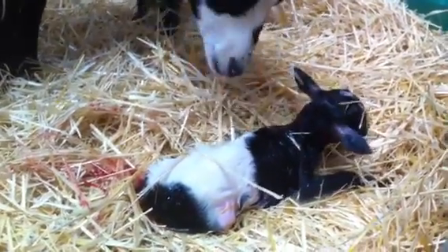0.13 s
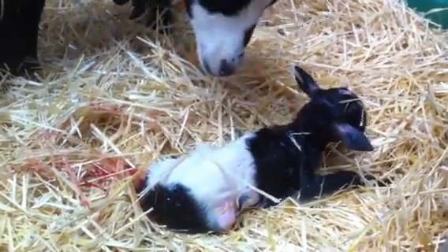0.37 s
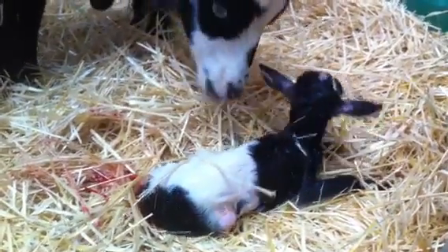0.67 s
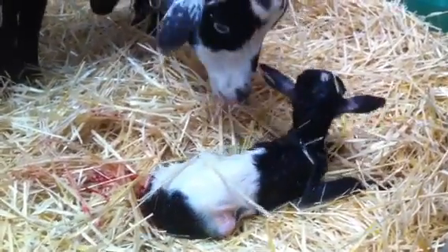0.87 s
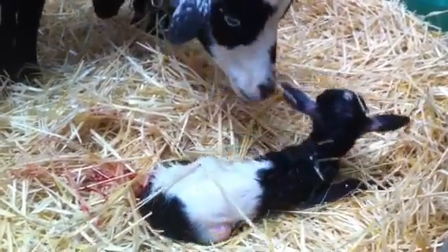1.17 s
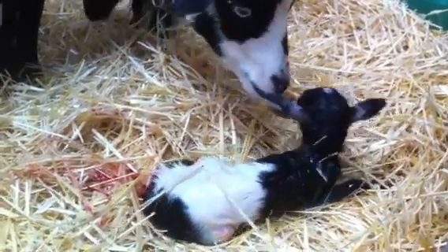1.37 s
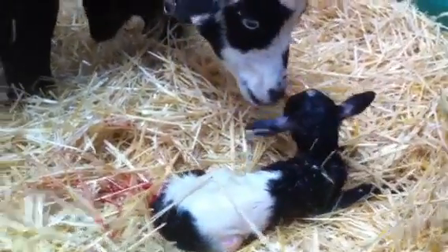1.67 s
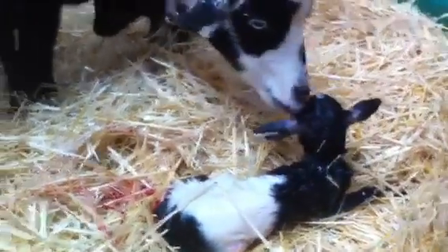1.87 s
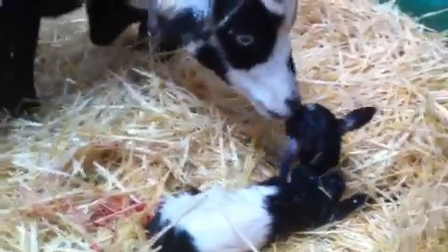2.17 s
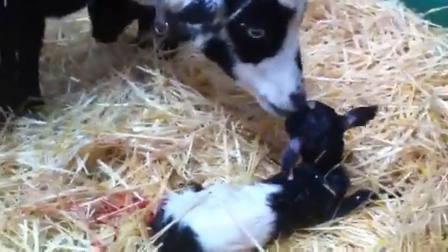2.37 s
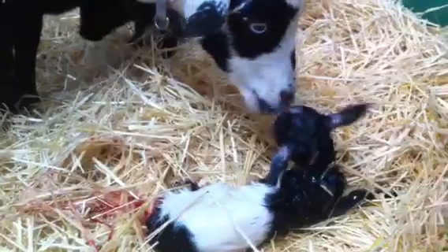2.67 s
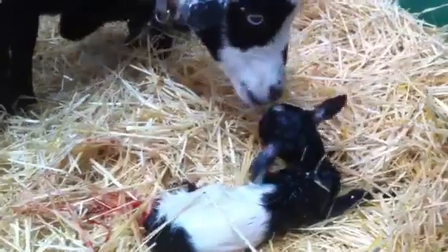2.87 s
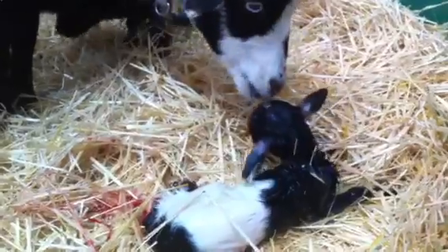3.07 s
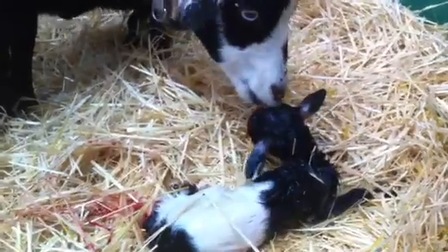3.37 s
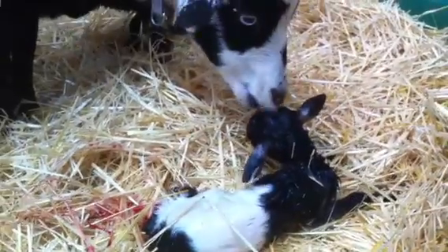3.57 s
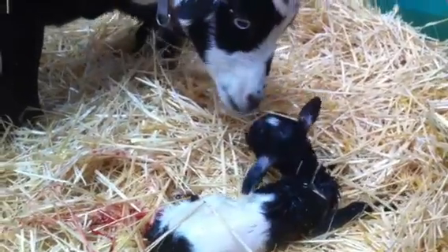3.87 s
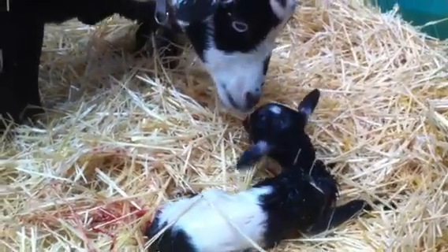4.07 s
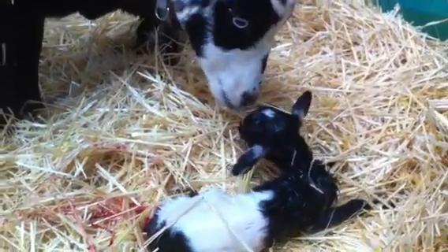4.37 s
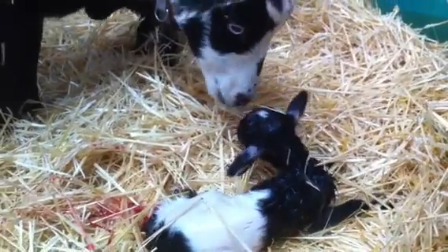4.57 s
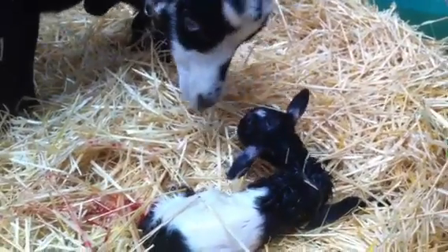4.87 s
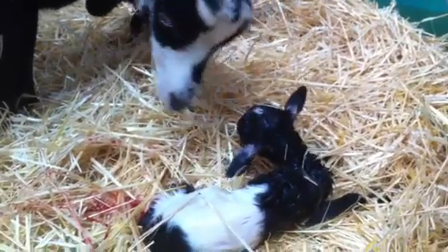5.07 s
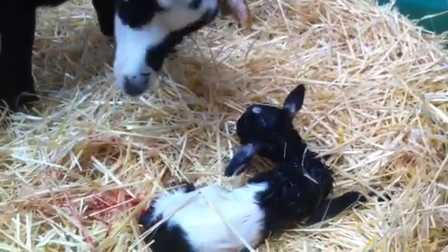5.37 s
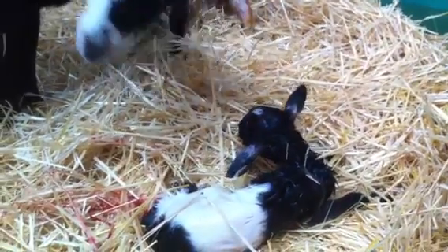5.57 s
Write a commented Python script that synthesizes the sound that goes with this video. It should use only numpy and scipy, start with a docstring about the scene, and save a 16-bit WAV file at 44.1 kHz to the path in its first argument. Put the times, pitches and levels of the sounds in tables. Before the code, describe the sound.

Near-quiet barn air opens, then a burst: raspy, high goat bleats from across the room, piercing two-toned squeals, a kid's short bleat nearby, treading, a hollow bump and crisp straw scuffs. The last cry slides down and fades. Afterwards come faint squeaks, tiny lip smacks and straw snaps, a small quavering bleat at four seconds, and low murmuring air. Single-channel close pickup.

```python
"""Goat pen in a barn

Straw-bedded pen. From across the barn a goat cries loudly, breaking between hoarse bleats (rough fold pulses
and hiss through a throat) and squeals (two strong partials under flickering overtones).
Close by, the newborn kid answers with two thin, throbbing bleats: fold pulses through a changing throat.
The doe shifts in the straw, bumps the pen and nuzzles the kid: shaped noise, short rings and a booming panel.
Behind it all lie small squeaks, licks and snaps, the barn's echo and a low murmur of air."""
import sys
import numpy as np
from scipy import signal
from scipy.fft import rfft, irfft, next_fast_len
from scipy.io import wavfile
from scipy.ndimage import uniform_filter1d, map_coordinates

SR = 44100
rng = np.random.default_rng(int(sys.argv[2]) if len(sys.argv) > 2 else 0)


def waveform_to_disk(signal):
    """Save audio, clipped to [-1, 1], as 16-bit WAV at the path in sys.argv[1]."""
    frames = np.transpose(np.atleast_2d(signal))
    scaled = np.clip(frames, -1, 1) * 32767
    samples = np.round(scaled).astype(np.int16)
    wavfile.write(sys.argv[1], SR, samples)


N = 252252

# Far goat, hoarse bleats: t/s, settling/s, hold/s, release/s, first f/Hz, held f/Hz, last f/Hz,
# relative level/dB, first and last mouth opening/dB, first and last roughness (0-1), air/dB,
# factor on the throat's resonances, firm core/dB, reach of the core f/Hz
HOARSE_BLEATS = [ (0.655, 0.06, 0.12, 0.15, 789, 949, 974, -32, -4.5, 17, 0.22, .8, 12.5, 1.005, -12.5, 1290),
                 (0.907, 0.021, 0.082, 0.16, 924.4, 1066, 1097, -30.5, -1, -9, .85, 0.7, 14.5, 1.06, -20.5, 3480),
                 (1.066, .022, 0.11, .07, 1137, 899, 936, -35.5, 8.5, 4.5, .8, 0.5, 3.5, 1.05, -13, 3800),
                 (1.335, .1, .185, 0.05, 858, 906.7, 945, -34, -3.5, 1, 0.28, .25, 7, 1.021, -4.5, 4390),
                 (1.896, 0.012, 0.105, 0.36, 1005, 775, 346, -30, -1.5, -6, .42, 0.6, 9.5, 0.99, -8.5, 2200)]
# Far goat's throat before that factor: f/Hz, level/dB
FAR_THROAT = [(100, -49), (450, -29.5), (700, -20), (920, 7.5), (1100, 1), (1300, -13.5), (1600, -7),
              (1850, -5.5), (2050, -1.5), (2250, 10), (2450, -7.5), (2800, -18.5), (3100, 3.5),
              (3300, -15.5), (3500, -20), (3900, -35), (4450, -34.5), (4750, -43.5), (5200, -43.5),
              (6800, -22.5), (8500, -35), (9600, -27), (10900, -43), (13500, -31.5), (16000, -33)]
# Pushes of the far goat's belly: t/s, level/dB, half width/s
FAR_THROBS = [(.745, 7, 0.02), (.95, 3, 0.051), (1.44, 6, 0.016), (1.513, 7.5, 0.0091)]
ATTACK_S, SLACK_S = 0.027, 0.25  # swell of a bleat; slackening of the throat once it is let go
RELEASE_DB, RELEASE_BEND = 32, 1.33  # level lost over the release, ever faster
BREATHY_DB = 7  # hiss gained on the voice over the release
RATTLE_HZ, RATTLE_DB = 190, 9  # mean rate; depth at full roughness


def hoarse_cry():
    """Fold pulses and hiss through the far throat; each bleat settles on a pitch, holds, then fades."""
    out, t = np.zeros(N), clock(size=30000)
    for (s, settle, hold, release, first_hz, held_hz, last_hz, db, first_mouth_db, last_mouth_db,
         first_rough, last_rough, air_db, tight, core_db, reach_hz) in HOARSE_BLEATS:
        spent = np.maximum(t - hold, 0) / release
        letting_go = np.minimum(spent, 1)
        progress = ramp(t, hold + release)
        pitch = held_hz + (first_hz - held_hz) * np.exp(-t / settle) + (last_hz - held_hz) * letting_go
        mouth_db = first_mouth_db + (last_mouth_db - first_mouth_db) * progress
        rough = first_rough + (last_rough - first_rough) * progress
        level_db = db + throbbing(s + t, FAR_THROBS) - RELEASE_DB * spent ** RELEASE_BEND
        level = ramp(t, ATTACK_S) * amp(level_db)
        source = folds(pitch, rough, jitter=.05, shimmer=4, uneven_db=3, rasp=amp(air_db),
                       flutter_rate=200, count=9)
        # a slower, uneven oscillation in the throat chops the rough voice into grains
        beat = np.cos(2 * np.pi * np.cumsum(RATTLE_HZ * (1 + .3 * wobble(90, len(t)))) / SR)
        rattle = amp(RATTLE_DB * rough * beat)
        air = split(rng.standard_normal(len(t)), edge_hz=6300)[1]
        hiss = amp(13.5 + air_db + BREATHY_DB * letting_go) * rough * air
        voice = rattle * (source + hiss)
        # the throat's upper resonances shift a little with the pitch
        slack_factor = tight * (last_hz / held_hz) ** 0.13
        held = throat(voice, np.multiply(FAR_THROAT, (tight, 1)))
        slack = throat(voice, np.multiply(FAR_THROAT, (slack_factor, 1)))
        low = split(held, edge_hz=1660)[0]
        slackening = held + (slack - held) * ramp(t - hold, SLACK_S)
        high = split(slackening, edge_hz=1370)[1]
        bleat = steady(low + amp(mouth_db) * high) + amp(core_db) * core(pitch, reach_hz)
        add(out, s, level * bleat)
    return out


# Far goat's two squeals: t/s, relative level of fundamental/dB, relative level of octave/dB
SHORT_SQUEAL = [(0.922, -44.5, -35), (0.944, -29, -25.5), (0.958, -31, -20), (1.06, -41, -40.5),
                (1.096, -46.5, -31), (1.118, -62, -37.5), (1.162, -53.5, -20.5), (1.21, -47, -35),
                (1.238, -41, -28), (1.262, -50.5, -37), (1.29, -47, -37.5)]
LONG_SQUEAL = [(1.475, -43, -31), (1.491, -42, -27), (1.529, -36, -33.5), (1.551, -29, -37.5),
               (1.573, -29, -26.5), (1.637, -28, -19.5), (1.675, -35.5, -29), (1.697, -52, -33.5),
               (1.719, -42, -19.5), (1.741, -34, -18.5), (1.769, -29.5, -27), (1.789, -32.5, -24),
               (1.817, -45, -19.5), (1.843, -39, -34), (1.867, -26, -34), (1.885, -32.5, -20.5),
               (1.917, -25.5, -34.5)]
# The voice in each squeal: first f/Hz, sag/(Hz/s), final droop/Hz, roughness (1 = rough)
SQUEAL_VOICE = [(1241, 175, 2, 0.89), (1098.3, 20, 58, 0.19)]
# The squeal's upper partials: f/Hz, relative level/dB
OVERTONES = [(3200, -40), (4300, -44), (5400, -60.5), (6500, -46.5), (7600, -45), (8700, -61),
             (9700, -41.5), (10800, -71.5), (12000, -51.5), (13000, -50), (14100, -59.5), (15200, -46)]
DROOP_S = .12  # the droop comes in about this long before the end
CRACK_ROUGH, CRACK_S = 1.2, .03  # a squeal cracks: roughness gained, and how long before its end
SQUEAL_JITTER, SQUEAL_SHIMMER_DB = .013, 2.2  # pitch and level unsteadiness per unit of roughness


def squeal(count=14):
    """The far voice flips to a whistle register: two strong partials under faint, flickering overtones."""
    out = np.zeros(N)
    for call, (hz, sag, droop, held_rough) in zip((SHORT_SQUEAL, LONG_SQUEAL), SQUEAL_VOICE):
        first_db, octave_db = curves(call)
        size = len(first_db)
        t = clock(size)
        pitch = hz - sag * t - droop * np.exp((t - t[-1]) / DROOP_S)
        rough = held_rough + CRACK_ROUGH * np.exp((t - t[-1]) / CRACK_S)
        # each overtone wavers in strength and phase
        flicker = [.8 + .55 * (wobble(38, size) + 1j * wobble(38, size)) for k in range(count + 1)]
        drift = 0.0018 * wobble(40, size) + SQUEAL_JITTER * rough * wobble(200, size)
        phase = 2 * np.pi * np.cumsum(pitch * (1 + drift)) / SR
        shimmer = amp(SQUEAL_SHIMMER_DB * rough * wobble(150, size))
        effort = uniform_filter1d(amp(first_db) + amp(octave_db), size=4000)
        upper = np.zeros(size)
        for k in range(3, count + 1):
            overtone = np.imag(flicker[k] * np.exp(1j * k * phase))
            upper += amp(along(OVERTONES, k * pitch) + 8.5) * overtone
        strong = amp(first_db) * np.sin(phase) + amp(octave_db) * np.sin(2 * phase)
        edges = signal.windows.tukey(size, .05)
        add(out, call[0][0], edges * np.sqrt(2) * shimmer * (strong + effort * upper))
    return out


# The newborn's bleats, close by: mouth opens t/s, voice gives out t/s, relative level/dB, mouth opening/dB
KID_BLEATS = [(0.896, 1.014, -37.5, 0.5), (4.095, 4.325, -47, 9.5)]
# Its voice in each bleat: t/s, f/Hz, roughness (0 = clean, about 1 = rough)
KID_VOICE = [
    [(.8, 780, 0.4), (.845, 1040, .6), (.9, 1018, .35), (.94, 1049, .95), (.972, 1003, 0.3),
     (1.0, 1039, .08), (1.025, 1039, .15), (1.06, 874, 1.1), (1.15, 701, 1)],
    [(3.955, 659, 0.48), (3.98, 851.3, 0.33), (4.012, 1043, .15), (4.06, 1054, 0), (4.085, 1028, 0.2),
     (4.096, 1045, 0.2), (4.11, 1037, .12), (4.145, 1073, .07), (4.172, 1023, 0), (4.21, 1037, 0.09),
     (4.243, 1033, 0.26), (4.3, 1043, 0), (4.32, 1024, .12), (4.338, 951, 0.86), (4.365, 738, 0.97),
     (4.48, 656, 1.14)],
]
# Its throat as each bleat opens and as it ends: f/Hz, level/dB
KID_THROATS = [ ([(500, -26.5), (1030, -9.5), (2070, -6.5), (3100, -6), (4150, -7), (6200, -13), (7250, -7),
               (8300, -3), (9300, -13), (16000, -19)], [(500, -13), (1030, -5.5), (2070, -3.5), (3100, -8),
               (4150, -2.5), (5200, -9), (6200, -5), (7250, -11), (8300, 2.5), (9300, -10), (12500, -9),
               (16000, -24)]), ([(100, -45), (500, -17), (1030, -9.5), (2070, 4), (3100, -0.5), (5200, -10),
               (6200, 2.5), (7250, -6.5), (8300, -21), (9300, -13), (11500, -9), (13600, -29),
               (16000, -32.5)], [(100, -50), (500, -34), (1030, -10), (2070, 0), (3100, -5.5), (4150, -12),
               (5200, -3), (6200, -2), (7250, -11), (8300, -7.5), (9300, -20), (10400, -18.5), (12500, -22),
               (16000, -41)])]
# Pushes of its belly: t/s, level/dB, half width/s
KID_THROBS = [(0.901, 4, 0.0087), (0.995, 10, 0.015), (3.988, 8.5, 0.018), (4.108, 9.5, 0.017),
              (4.19, 15.5, 0.019), (4.293, 13, 0.014), (4.333, 4.5, 0.031)]
BLEAT_ATTACK_S, THROAT_GLIDE_S = 0.021, 0.099  # swell; passage from one throat shape to the next
FADE_DB_PER_S = 187.5  # the level falls away once the voice gives out
SHUT_DB, SHUT_DULL_DB, OPENING_S = -9, -29, 0.0079  # a shut mouth is softer and duller; opening time
THROB_DULL = 0.7  # dB of brightness lost per dB of throb


def newborn():
    """The voice scoops up behind a shut mouth, opens, throbs as the throat changes, then drops, rough."""
    out = np.zeros(N)
    for (opens, gives_out, db, open_db), voice, shapes in zip(KID_BLEATS, KID_VOICE, KID_THROATS):
        first_shape, last_shape = shapes
        pitch, rough = curves(voice)
        s = voice[0][0]
        t = s + clock(len(pitch))
        throb_db = throbbing(t, KID_THROBS)
        ending = np.maximum(t - gives_out, 0)
        shut = 1 - np.exp(np.minimum(t - opens, 0) / OPENING_S)
        mouth_db = open_db + SHUT_DULL_DB * shut - THROB_DULL * throb_db
        level_db = db + throb_db + SHUT_DB * shut - FADE_DB_PER_S * ending
        level = ramp(t - s, BLEAT_ATTACK_S) * amp(level_db)
        source = folds(pitch, rough, jitter=.035, shimmer=4.2, uneven_db=2.5, rasp=1.5,
                       flutter_rate=250, count=15)
        glide = ramp(t - opens, THROAT_GLIDE_S) ** 2
        shaped = (1 - glide) * throat(source, first_shape) + glide * throat(source, last_shape)
        low, rest = split(shaped, edge_hz=1300)
        middle, high = split(rest, edge_hz=6200)
        add(out, s, level * steady(low + amp(0.71 * mouth_db) * middle + amp(mouth_db) * high))
    return out


# The doe's steps in the bedding: t/s, thud relative level/dB, rustle relative level/dB
STEPS = [(.7, -56.5, -71.5), (0.871, -44.5, -37), (.95, -50, -34.5), (1.08, -54, -36), (1.24, -37, -39.5),
         (1.32, -48.5, -47), (2.108, -56.5, -55.5)]
# Spectrum of the thuds: f/Hz, level/dB
THUD = [(25, -34), (65, -22.5), (115, 0), (250, 0), (400, -4), (560, 3), (1000, -13), (2500, -29)]
# Spectrum of the rustling bedding: f/Hz, level/dB
RUSTLE = [(200, -26.5), (700, -2.5), (1800, 4), (3400, -1.5), (4700, -5.5), (5600, -13.5), (8000, -14),
          (10000, -18), (16000, -19.5)]
# Her weight on the ground: a short low step thud, then a hard bump against the pen; t/s, relative level/dB,
# swell/s, t60/s
BUMPS = [(0.976, -45.5, 0.006, 0.1), (1.204, -25.5, 0.023, 0.29)]
# Spectrum of the bumped pen: f/Hz, level/dB
PEN = [(30, -37), (90, -17), (150, -11.5), (220, 0), (350, -8), (550, -3), (900, -2.5), (2000, -6.5),
       (4000, -13.5), (8000, -15.5), (16000, -27)]
# Hooves scuffing through straw: t/s, relative level/dB, swell/s, t60/s
SCUFFS = [(1.207, -20, 0.001, 0.084), (1.284, -24, 0.0014, 0.23), (1.37, -42, 0.012, 0.3),
          (1.408, -25, 0.0071, 0.22)]
# Spectrum of the scuffed straw: f/Hz, level/dB
STRAW = [(300, -39), (2000, -13), (6000, -8), (8500, -2.5), (12000, -3), (16000, -1.5)]
STEP_SWELL_S, STEP_T60_S = 0.011, 1.31  # each step swells, then the straw settles


def doe():
    """Close by, noise swells and dies as she treads the bedding, bumps the pen and scuffs the straw."""
    thud_power, rustle_power, t = np.zeros(N), np.zeros(N), clock(size=2 * SR)
    step = (1 - np.exp(-t / STEP_SWELL_S)) * amp(-60 * t / STEP_T60_S)
    for s, thud_db, rustle_db in STEPS:
        add(thud_power, s, (amp(thud_db) * step) ** 2)
        add(rustle_power, s, (amp(rustle_db) * step) ** 2)
    grains = amp(2.0 * wobble(900) + 1.6 * wobble(70))
    stalks = unit(colour(rng.standard_normal(N) * grains, RUSTLE))
    tread = np.sqrt(thud_power) * noise(THUD) + np.sqrt(rustle_power) * stalks
    bumps = amp(7.5) * bursts(BUMPS, PEN, grain_db=-1.0)
    return tread + bumps + bursts(SCUFFS, STRAW, grain_db=1.5)


def bursts(rows, points, grain_db):
    """Crackling noise that swells and dies after each push."""
    shape = np.zeros(N)
    for s, db, swell, t60 in rows:
        age = np.maximum(clock() - s, 0)
        shape += amp(db - 60 * age / t60) * (1 - np.exp(-age / swell))
    return shape * unit(colour(rng.standard_normal(N) * amp(grain_db * wobble(1900)), points))


# Modes of the pen wall: f/Hz, relative level/dB, t60/s
PANEL_MODES = [(224.5, -2, 0.32), (313.6, -15, 0.25), (469.5, -12, .3), (596, -12, 0.21), (753, -8, 0.12)]


def panel():
    """The pen wall booms briefly, as decaying and slightly unsteady modes, when it is bumped."""
    out, t = np.zeros(N), clock(size=SR)
    for s, push_db, _, _ in BUMPS:
        ring = np.zeros(len(t))
        for hz, db, t60 in PANEL_MODES:
            phase = 2 * np.pi * hz * t + .8 * wobble(45, len(t))
            ring += amp(db - 60 * t / t60) * np.sin(phase)
        add(out, s, amp(push_db - 0.5) * ramp(t, 0.012) * ring)
    return out


# Licks, lip smacks and straw snaps: t/s, relative level/dB, ring f/Hz, ring share (0-1), t60/s
TICKS = [(0.299, -53.5, 396, 0.93, 0.054), (0.392, -51, 382, 0.81, 0.088), (2.349, -39, 13100, .2, 0.016),
         (2.374, -49.5, 4240, 0.5, 0.11), (2.503, -48.5, 340, 0.77, 0.14), (2.598, -52, 3480, .2, 0.028),
         (2.772, -52.5, 11300, .4, 0.022), (2.856, -46, 1895, 0.33, 0.03), (2.864, -49, 1697, 0.46, 0.019),
         (3.268, -49.5, 1466, .38, 0.027), (3.431, -51, 3490, .3, 0.032), (4.094, -34.5, 3174, 0.59, 0.047),
         (4.924, -49, 830, 0.69, .06), (5.136, -46, 9430, .4, 0.022), (5.221, -54, 1000, 0.58, .03),
         (5.416, -52, 1024, .7, 0.026), (5.570, -46.5, 11800, .3, .02), (5.594, -57, 2780, .2, .02),
         (5.617, -43, 940, 0.67, 0.024)]
FAINT_TICK_DB, FAINT_TICK_HZ = -54, 3000  # fainter ones scatter by chance about this level and pitch


def ticks(count=12):
    """Licks, smacks and snaps: a tiny crack, duller for the low ones, and a short, impure ring."""
    out, t = np.zeros(N), clock(size=SR // 10)
    faint = []
    for when, force, tone in rng.random((count, 3)):
        hz = FAINT_TICK_HZ * 4 ** (2 * tone - 1)
        faint.append((when * N / SR, FAINT_TICK_DB + 6 * (force - .5), hz, .3, .02))
    for s, db, hz, share, t60 in TICKS + faint:
        crack = .5 * unit(split(rng.standard_normal(len(t)), edge_hz=3 * hz)[0])
        ring = np.sin(2 * np.pi * hz * t + wobble(hz / 6, len(t)))
        add(out, s, amp(db - 2.0 - 60 * t / t60) * ((1 - share) * crack + share * ring))
    return out


# Faint, thin tones: centre t/s, f/Hz, relative level/dB; the first, at 2.2 s, strengthens a partial of the far
# goat's falling bleat, the rest are faint squeaks
SQUEAKS = [(2.2, 967, -45.5), (2.41, 1036, -53.5), (4.9, 2267, -72), (5.69, 2380, -74)]
SQUEAK_WIDTH_S, SQUEAK_SAG_HZ_PER_S = 0.034, 511


def squeaks():
    """Brief, nearly pure tones that sag as they swell and fade."""
    out, t = np.zeros(N), clock(size=SR // 4) - 1 / 8  # time zero is the middle of the squeak
    for s, hz, db in SQUEAKS:
        pitch = (hz - SQUEAK_SAG_HZ_PER_S * t) * (1 + 0.0403 * wobble(210.0, len(t)))
        tone = np.sqrt(2) * np.sin(2 * np.pi * np.cumsum(pitch) / SR)
        level = amp(db + 4 * wobble(110, len(t))) * bell(t, SQUEAK_WIDTH_S)
        add(out, s + t[0], level * tone)
    return out


# The doe's muzzle brushing coat and straw: t/s, half width/s, body level/dB, hiss level/dB
NUZZLES = [(.13, 0.069, -67, -71), (.5, 0.1, -66, -65.5), (2.529, 0.21, -60.5, -66),
           (3.45, 0.14, -64.5, -112), (3.885, 0.071, -73, -65), (4.675, 0.025, -81, -62),
           (5.12, 0.12, -72, -66), (5.24, 0.0636, -67, -73.5), (5.7, 0.059, -85, -61.5)]
# Spectrum of the barn's air and the quiet straw: f/Hz, level/(dB per Hz)
BARN_AIR = [(25, -37.5), (45, -41), (65, -18.5), (90, -13.5), (135, 2), (200, -2), (300, -2), (450, -3),
            (700, -6), (1150, -7), (1800, -13), (2600, -14.5), (8000, -17.5), (16000, -18.5)]
BODY_FLOOR_DB, HISS_FLOOR_DB = -69.5, -68  # the bedding at rest


def bedding():
    """The barn's low murmur of air, and a fine crackle of straw that swells with each nuzzle."""
    body_power, hiss_power = amp(BODY_FLOOR_DB) ** 2, amp(HISS_FLOOR_DB) ** 2
    for s, width, body_db, hiss_db in NUZZLES:
        swell = bell(clock() - s, width)
        body_power = body_power + (amp(body_db) * swell) ** 2
        hiss_power = hiss_power + (amp(hiss_db) * swell) ** 2
    rumble = split(noise(BARN_AIR), edge_hz=306)[0]
    stalks = colour(rng.standard_normal(N) * amp(2.0 * wobble(500)), BARN_AIR)
    body, hiss = split(split(stalks, edge_hz=290)[1], edge_hz=2800)
    straw_body = np.sqrt(body_power) * amp(0.91 * wobble(30)) * unit(body)
    straw_hiss = np.sqrt(hiss_power) * amp(0.58 * wobble(25)) * unit(hiss)
    return amp(-71.0 + 1.623 * wobble(12.0)) * unit(rumble) + straw_body + straw_hiss


# How long the barn rings: f/Hz, t60/s
BARN_T60 = [(150, 0.87), (500, 0.54), (1000, 0.43), (2300, 0.49), (5000, 0.37), (12000, 0.0097)]


def barn(x, wet_db):
    """Add the barn's echo: a noise tail, each frequency dying at its own speed."""
    hz, t, z = signal.stft(rng.standard_normal(SR), SR, nperseg=256)
    decay = amp(-60 * t / along(BARN_T60, hz)[:, None])
    tail = signal.istft(z * decay, SR, nperseg=256)[1]
    late = np.pad(x, (350, 0))  # the echo starts 350 samples, about 8 ms, after the direct sound
    return x + amp(wet_db) * signal.fftconvolve(late, tail / np.linalg.norm(tail))[:N]


def folds(pitch, rough, jitter, shimmer, uneven_db, rasp, flutter_rate, count):
    """Vocal-fold pulses; roughness unsettles their timing and size and adds a puff of air to each."""
    size = len(pitch)
    phase = 2 * np.pi * np.cumsum(pitch * (1 + jitter * rough * wobble(flutter_rate, size))) / SR
    pulses = np.zeros(size)
    for k in range(1, count + 1):  # every partial also swells and fades by itself
        pulses += amp(uneven_db * wobble(35, size)) * np.cos(k * phase)
    air = rng.standard_normal(size) * (1 + np.cos(phase))
    return (pulses + rasp * rough * air) * amp(shimmer * rough * wobble(flutter_rate, size))


def core(pitch, reach_hz, count=5):
    """The firm low partials that carry a hoarse voice's pitch, 12 dB down at their reach."""
    size = len(pitch)
    phase = 2 * np.pi * np.cumsum(pitch * (1 + .012 * wobble(130, size))) / SR
    partials = np.zeros(size)
    for k in range(1, count + 1):
        level_db = 3 * wobble(70, size) - 12 * (k * pitch / reach_hz) ** 2
        partials += amp(level_db) * np.sin(k * phase)
    return unit(partials)


def throat(x, points):
    """Ring x through a causal (minimum-phase) filter with a (Hz, dB) spectrum."""
    size = 4096
    cepstrum = irfft(np.log(amp(along(points, np.fft.rfftfreq(size, 1 / SR)))))
    # folding the cepstrum forward makes the filter causal
    cepstrum[1:size // 2] *= 2
    cepstrum[size // 2 + 1:] = 0
    return signal.fftconvolve(x, irfft(np.exp(rfft(cepstrum))))[:len(x)]


def throbbing(t, rows):
    """The dB that pushes of the belly add to a voice."""
    return sum(db * bell(t - s, width) for s, db, width in rows)


def amp(db):
    """Decibels to gain."""
    return 10 ** (np.asarray(db) / 20)


def unit(x):
    """Scale to rms 1."""
    return x / np.sqrt(np.mean(x ** 2) + 1e-20)


def steady(x):
    """Hold x near rms 1 over 1100 samples, a few hundredths of a second."""
    return x / np.sqrt(np.abs(uniform_filter1d(x ** 2, size=1100)) + 1e-9)


def clock(size=N):
    """The time of every sample, in seconds."""
    return np.arange(size) / SR


def ramp(t, length):
    """Rise from 0 to 1 over a length of time."""
    return np.clip(t / length, 0, 1)


def bell(t, width):
    """A smooth swell around time zero."""
    return np.exp(-.5 * (t / width) ** 2)


def along(points, hz):
    """Interpolate (Hz, value) points on a log frequency axis."""
    f, v = np.transpose(points)
    return np.interp(np.log(hz + 1), np.log(f + 1), v)


def curves(rows):
    """One value per sample, from the first row to the last, for each column after the time."""
    s, *cols = np.transpose(rows)
    return [np.interp(np.arange(s[0], s[-1], 1 / SR), s, c) for c in cols]


def wobble(rate, size=N):
    """A smooth random curve, rate knots a second."""
    return map_coordinates(rng.standard_normal(int(N * rate / SR) + 4), [clock(size) * rate])


def filtered(x, response):
    """x times a response of frequency."""
    m = next_fast_len(len(x) + 8192)
    return irfft(rfft(x, m) * response(np.fft.rfftfreq(m, 1 / SR)), m)[:len(x)]


def colour(x, points):
    """x through a (Hz, dB) spectrum."""
    return filtered(x, lambda hz: amp(along(points, hz)))


def noise(points):
    """Coloured noise of rms 1."""
    return unit(colour(rng.standard_normal(N), points))


def split(x, edge_hz):
    """The parts of x under and over an edge."""
    low = filtered(x, lambda hz: 1 / (1 + (hz / edge_hz) ** 8))
    return low, x - low


def add(out, s, x):
    """Mix x into out from time s on."""
    part = out[round(s * SR):][:len(x)]
    part += x[:len(part)]


def scene():
    """The far hoarse bleats fill the barn; the squeals get only a faint echo, since their level rows already
    swell and dip as they sweep through the barn; the near animals come more directly."""
    cry = barn(hoarse_cry() + squeaks(), wet_db=-10)
    whistle = barn(squeal(), wet_db=-20)
    kid = barn(newborn(), wet_db=-11.5)
    pen = barn(doe() + panel() + ticks(), wet_db=-14.5)
    return (cry + whistle + kid + pen + bedding())[None]


TOP_HZ = 15950  # upper band limit


def record(dry):
    """One microphone channel that keeps nothing above its band limit."""
    return filtered(dry[0], lambda hz: hz < TOP_HZ)[None]


dry = scene()
out = record(dry)
waveform_to_disk(out)
```